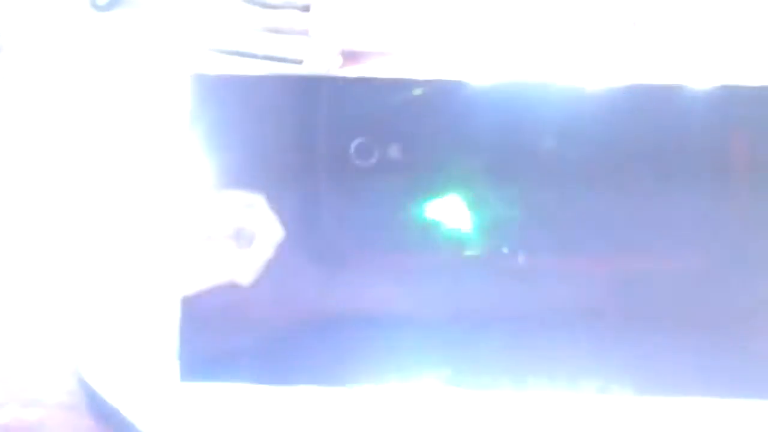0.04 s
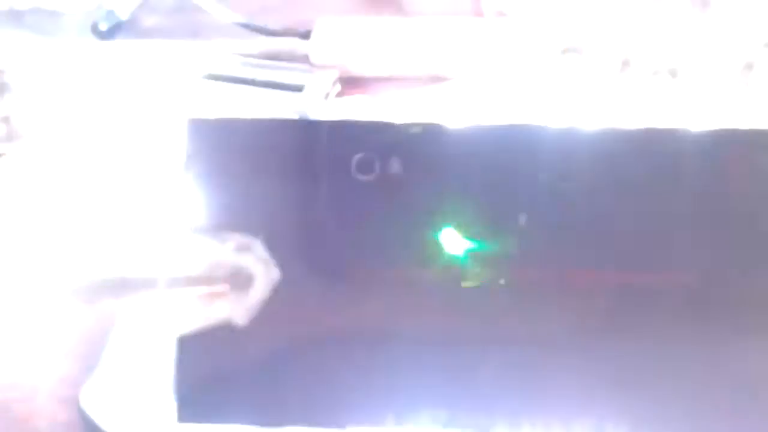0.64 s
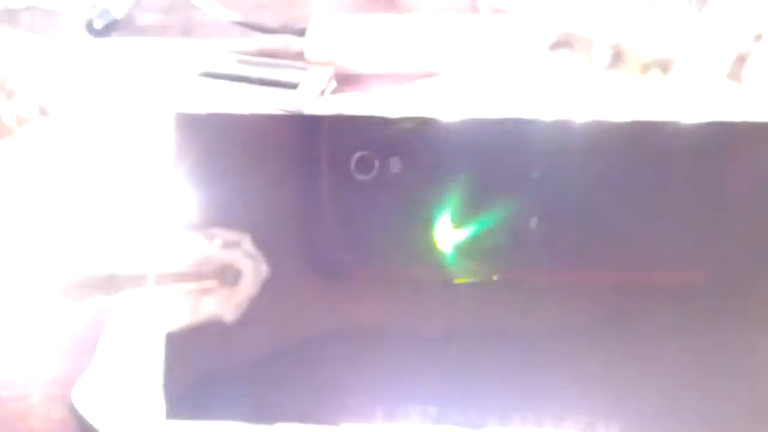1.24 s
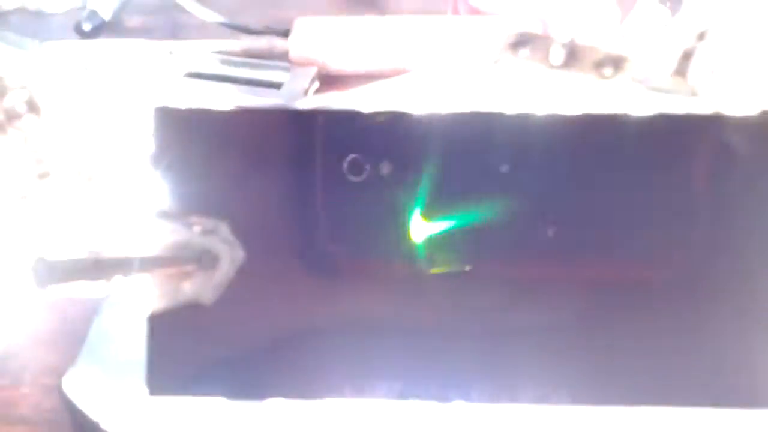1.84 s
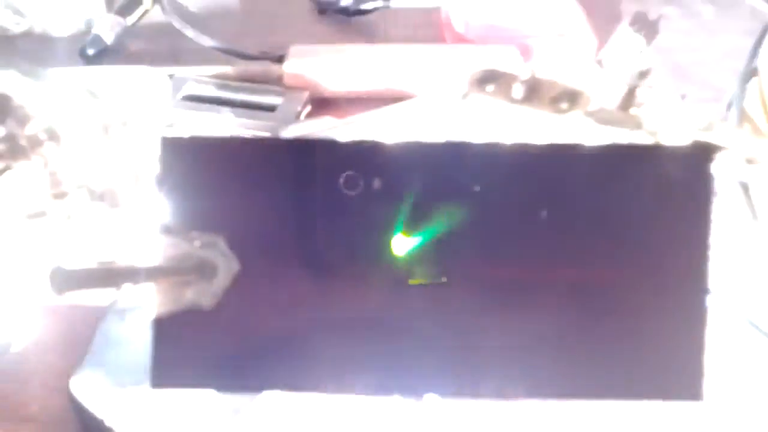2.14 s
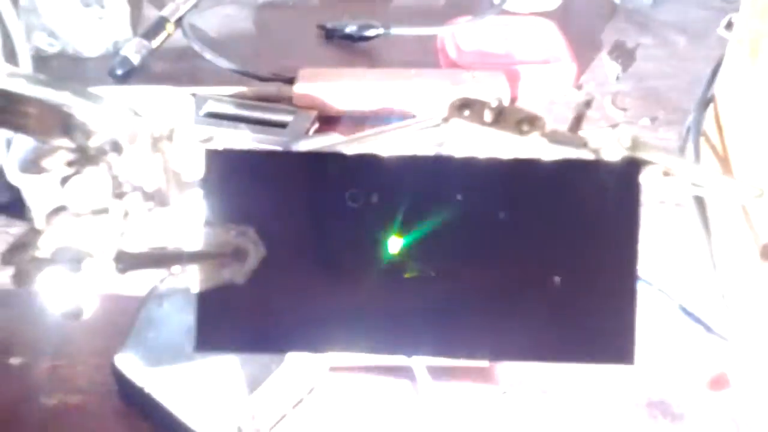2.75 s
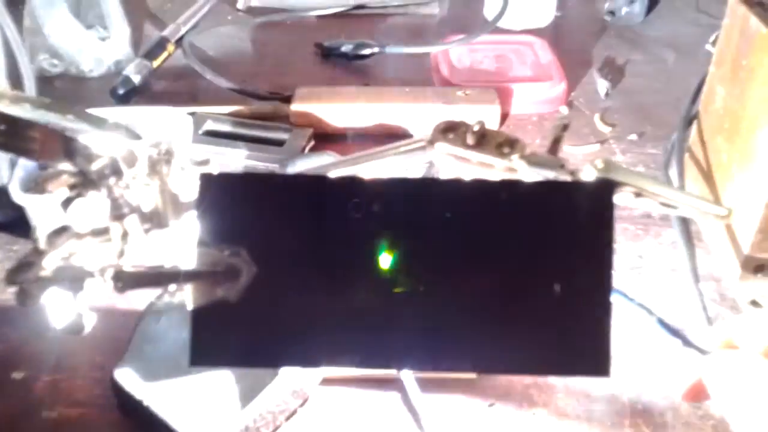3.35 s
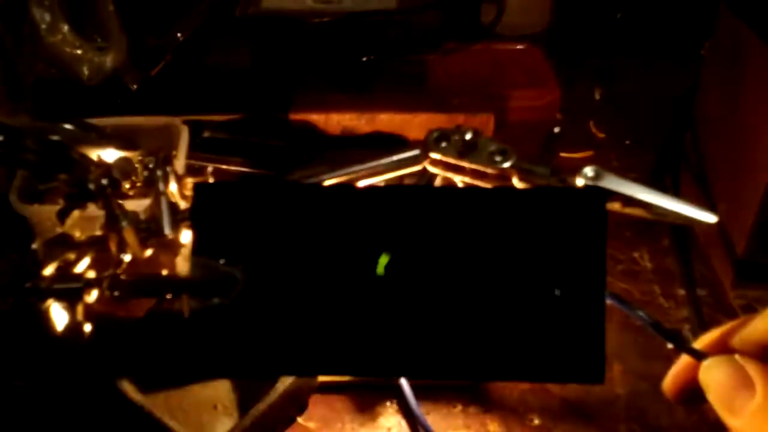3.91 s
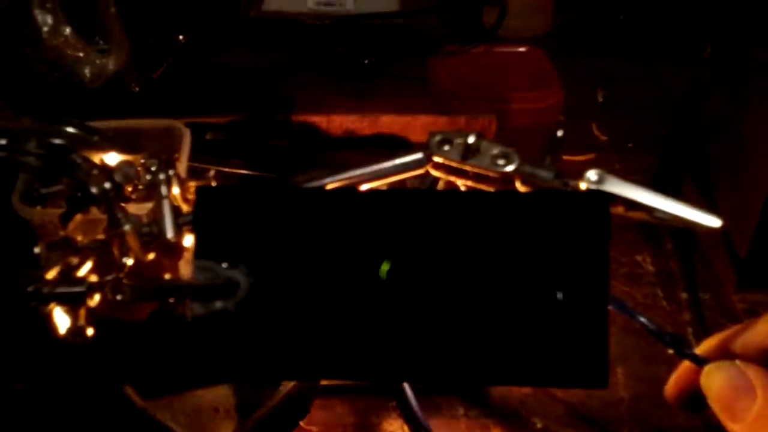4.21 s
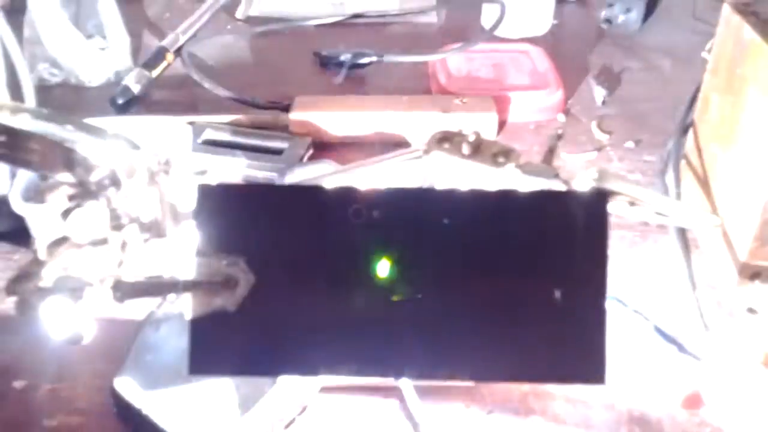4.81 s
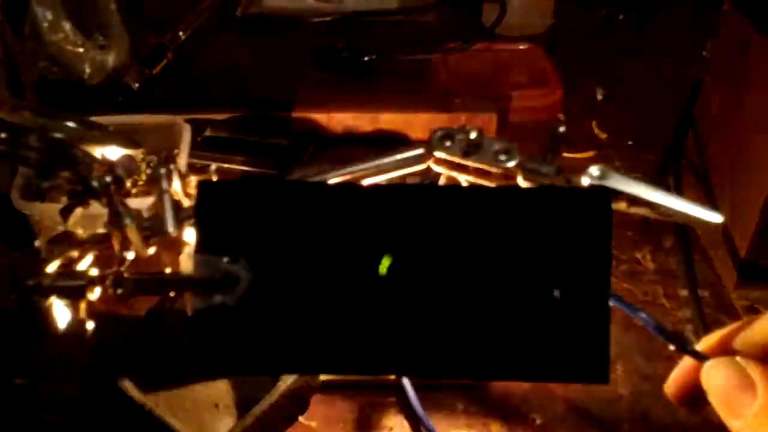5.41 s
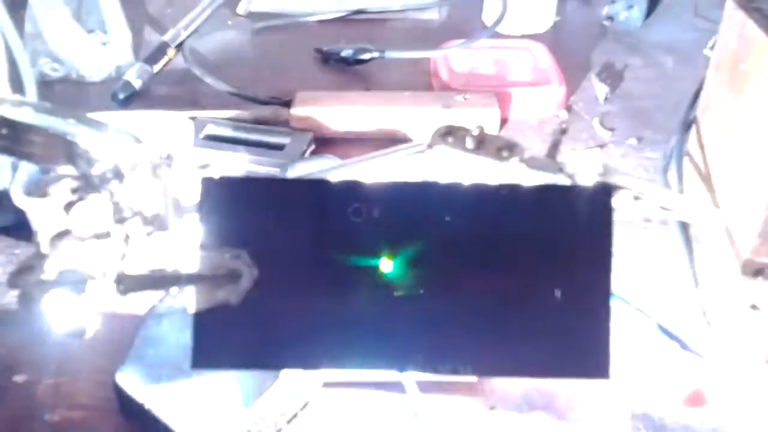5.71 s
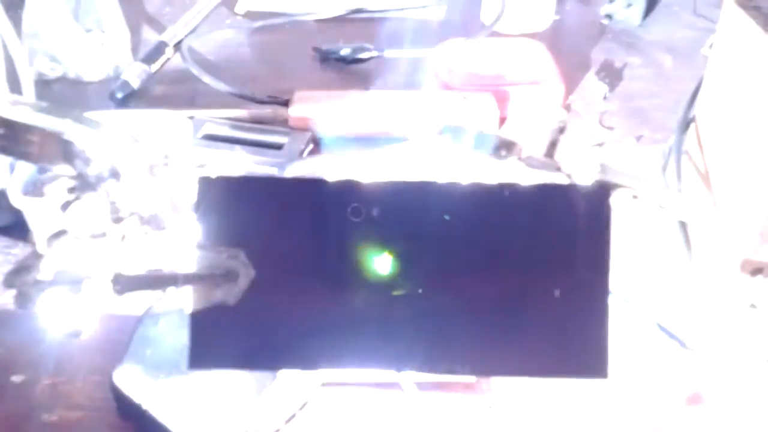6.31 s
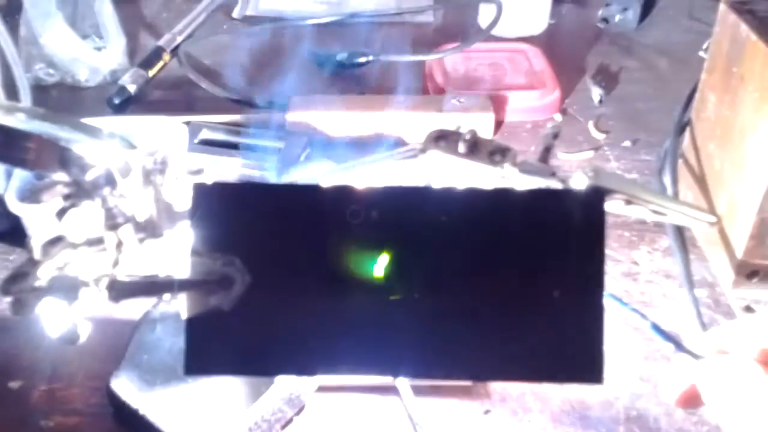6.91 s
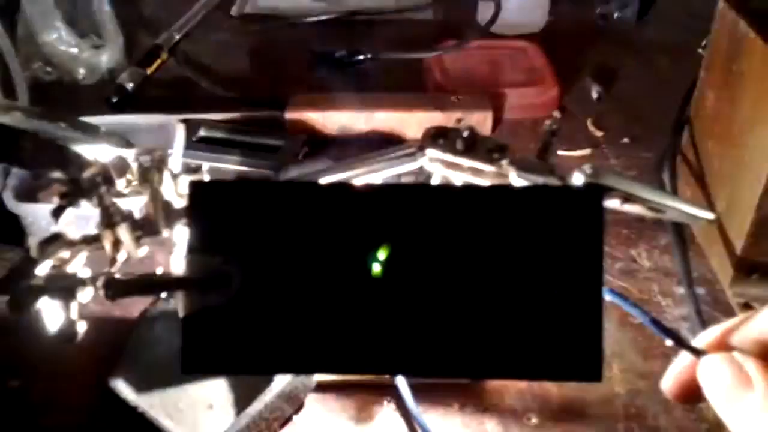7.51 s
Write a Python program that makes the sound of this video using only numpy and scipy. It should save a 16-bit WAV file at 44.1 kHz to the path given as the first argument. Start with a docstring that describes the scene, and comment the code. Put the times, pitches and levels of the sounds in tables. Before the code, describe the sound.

Close up in a small room, an electric arc between carbon rods spits out a short burst, then buzzes and hisses unevenly for about three seconds. A faint transformer hum shows in the pauses. The arc strikes twice more with sharp cracks and a gritty, high sizzle; the final burn stumbles with a few hollow pops and drops to a steadier, deeper buzz.

```python
"""On a workbench in a small room, a mains-fed carbon arc is struck four times near a small microphone.
Alternating current passes through zero twice a cycle, so in each half-cycle the arc lights, hisses on
the anode and goes out with a puff of collapsing gas. Often one polarity burns silently: the period
doubles and the buzz drops an octave. The gap cracks as it breaks down, narrow resonances give the hiss
a thin, ringing colour, and a transformer hums throughout, heard between the burns."""
import sys
import numpy as np
from scipy import signal
from scipy.fft import rfft, irfft
from scipy.io import wavfile

SR = 44100
rng = np.random.default_rng(int(sys.argv[2]) if len(sys.argv) > 2 else 0)


def inscribe(sig):
    """Save sig as 16-bit PCM at rate SR to the path in sys.argv[1].

    A 1-D sig is mono; a 2-D sig holds one channel per row.
    Samples are clipped to [-1, 1] before scaling.
    """
    pcm = np.round(np.clip(np.atleast_2d(sig).T, -1, 1) * 32767)
    wavfile.write(sys.argv[1], SR, pcm.astype(np.int16))


N = 332955
TIME = np.arange(N) / SR
MAINS_HZ = 60.03


def undb(db):
    """Amplitude grows tenfold for every 20 dB."""
    return 10 ** (np.asarray(db) / 20)


def level(x, db):
    """Normalisation: scale a signal to an rms level in dB."""
    return x * undb(db) / np.sqrt(np.mean(x ** 2))


def curve(table, t):
    """Linear interpolation: each column after the first (time), read at times t."""
    times, *columns = np.transpose(table)
    return [np.interp(t, times, column) for column in columns]


def colour(x, points, size=4096):
    """Minimum-phase filtering, with unit energy, through (Hz, dB) points."""
    hz, db = np.transpose(points)
    bins = np.maximum(np.arange(size // 2 + 1) * SR / size, 1)
    cepstrum = irfft(np.log(undb(np.interp(np.log(bins), np.log(hz), db))))
    cepstrum[1:size // 2] *= 2
    cepstrum[size // 2 + 1:] = 0
    response = irfft(np.exp(rfft(cepstrum)))
    return signal.fftconvolve(x, response / np.linalg.norm(response))[:N]


def wander(rate_hz):
    """Random modulation: Gaussian values joined by straight lines, with a spread near 1."""
    return np.interp(TIME * rate_hz, np.arange(N), rng.standard_normal(N))


def impulses(times, sizes):
    """Fractional delay: each click is shared between two samples."""
    out, at = np.zeros(N + 1), np.clip(times * SR, 0, N - 1)
    np.add.at(out, at.astype(int), sizes * (1 - at % 1))
    np.add.at(out, at.astype(int) + 1, sizes * (at % 1))
    return out[:N]


def fading(x, decay_s):
    """Exponential decay: every input dies away with one time constant."""
    return signal.lfilter([1], [1, -np.exp(-1 / (decay_s * SR))], x)


# One list per burn, from strike to break; the last settles into a calm, one-sided buzz.
# Each row: time in seconds, forward hiss, reverse hiss and puff in dB, rasp relative to hiss in dB,
# unrest from 0 to 1, ignition in milliseconds into the half-cycle.
ARC_BURNS = [
    [(0, -4, -8.5, -13, -10.5, 0.94, 0.76), (.12, -7, -7.5, -12, -6.5, 1, 1.6),
     (.203, -12, -12.5, -27, -13.5, 1, 1.3)],
    [(.507, -4.5, -6, -30.5, -15, .9, 2), (.63, -4, -4.5, -16, -13, .9, 2),
     (.95, -7.5, -5.5, -12, -10.5, 0.97, 2.73), (1.85, -10, -7.5, -14, -11, 0.99, 2.6),
     (2.3, -13.5, -12, -12, -5.5, 0.96, 2.6), (2.85, -13, -13.5, -17.5, -8.5, .8, 2.6),
     (3.1, -11.5, -16, -19.5, -11, 0.3, 2.68), (3.4, -14, -15, -20.5, -10.5, .3, 2.6),
     (3.53, -26.5, -22, -22.5, -2, .3, 4.1)],
    [(4.297, -18, -13, -38, -21, 0.8, 1.9), (4.36, -11, -4.5, -17.5, -15, 0.8, 2),
     (4.51, -11.5, -8.5, -11, -6.5, 1, 2), (4.58, -12, -9, -18, -8, .6, 2),
     (4.85, -7, -16, -22, -10, .3, 2.63), (4.97, -15, -7.5, -21, -12, 0.4, 2.9),
     (5.08, -17.5, -15, -21.5, -5.5, 0.1, 3.2)],
    [(5.53, -17, -7.5, -24, -11, 0.5, 1.4), (5.61, -3.5, -4, -11, -11.5, 0.9, 2),
     (5.89, -11.5, -10, -12, -3.5, 0.7, 1.8), (5.97, -41, -20.5, -16, -10, 0.8, 1.7),
     (6.06, -70, -14.5, -19, -13.5, 0.5, 1.5), (6.3, -73, -20, -18.5, -13, 0.3, 1.8),
     (6.92, -70, -17.5, -17, -18.5, 0.02, 2.9), (7.02, -70, -13, -16.5, -23, .03, 2.7),
     (7.09, -70, -21.5, -16, -16.5, 0.17, 3), (7.46, -70, -25.5, -18, -11, 0.3, 3.1),
     (7.476, -70, -70, -20, -8, 0, 3.1), (7.56, -70, -70, -26, -8, 0.1, 3.1)],
]
def burn(t, break_db_per_s=1201):
    """The arc's envelope: a gain that decays fast once it breaks, then the six settings at times t."""
    forward_db, reverse_db, puff_db, rasp_db, unrest, ignition_ms = curve(np.concatenate(ARC_BURNS), t)
    alive = sum((t >= rows[0][0]) * undb(-break_db_per_s * np.maximum(t - rows[-1][0], 0))
                for rows in ARC_BURNS)
    return alive, forward_db, reverse_db, puff_db, rasp_db, np.clip(unrest, 0, 1), ignition_ms


# Lulls of the sputtering arc. Each row: start and end in seconds, change of reverse hiss and of
# forward hiss in dB, preceding flare in dB.
ARC_LULLS = [(0.124, 0.155, -1, -27, -2.5), (0.566, 0.599, -35, -27, -0.5), (0.744, 0.779, -4, -4.5, 5),
             (1.03, 1.053, -20, -1, 2.5), (1.077, 1.101, -2, 2, -3.5), (1.142, 1.199, -33, -1, 0.5),
             (1.28, 1.328, -30, -0.5, 2.5), (1.38, 1.44, -30, 2, -0.5), (1.489, 1.515, -26, -0.5, -5),
             (1.543, 1.62, -32, 0.5, 6.5), (1.647, 1.714, -31, 3, 3), (1.748, 1.792, -19, 0, 3),
             (1.862, 1.865, -8, 3.5, 6.5), (1.928, 1.947, -20, 1, 4), (1.99, 2.05, -27, 0.5, 5),
             (2.124, 2.15, -19, 1, 0.5), (2.3, 2.317, -28, 0, 1.5), (2.382, 2.435, -25, 2.5, 5.5),
             (2.495, 2.517, -23, 3, 4.5), (2.584, 2.647, -20, -0.5, 10), (2.671, 2.713, -19, 0, 9),
             (2.76, 2.79, -12, -1, 7), (2.857, 2.879, -16, 5.5, 10.5), (2.957, 2.989, -4.5, 1, -2),
             (3.011, 3.055, -9, -1.5, 2), (3.135, 3.165, -20, -5, -3), (3.236, 3.255, -25, -8, -9),
             (3.281, 3.347, -30, -3.5, -1), (3.36, 3.528, -19, -1, -2), (4.316, 4.322, 0, -10.5, -3),
             (4.543, 4.575, -20, -2.5, -1), (4.685, 4.717, -17, -5, -5.5), (4.8, 4.818, -23, -14, -13),
             (4.878, 4.93, -26, -6.5, 0), (4.979, 5.12, -28, 0.5, 0), (6.27, 6.28, -7, 0, 3),
             (7.033, 7.052, -8, 0, 0)]
def sputter(t, flare_lead_s=0.015, flare_width_s=0.022, sag_lag_s=0.012, sag_db=-11.5):
    """Instability: the flame flares, tears off and leaves a lull, shifting hiss and flame size in dB."""
    start, end, reverse_db, forward_db, flare_db = np.transpose(ARC_LULLS)[:, :, None]
    lull = (t > start) & (t < end)
    shrunk = (t - sag_lag_s > start) & (t - sag_lag_s < end)
    flare = np.exp(-((t - start + flare_lead_s) / flare_width_s) ** 2)
    flame_db = flare_db * flare + sag_db * shrunk
    return (forward_db * lull).sum(axis=0), (reverse_db * lull).sum(axis=0), flame_db.sum(axis=0)


def extinction_ms(unrest):
    """Extinction comes later in the half-cycle when the arc is restless."""
    return 4.87 + 0.63 * unrest


def flame_size(t):
    """Amplitude modulation: the gas column follows the sputtering as far as the arc is restless."""
    alive, _, _, puff_db, _, unrest, _ = burn(t)
    *_, flame_db = sputter(t)
    return alive * undb(puff_db + unrest * flame_db)


def spark_noise(envelope, spectrum, bench_db=-4, decay_s=0.0023):
    """Scattering from clutter on the bench draws out the energy of each noise burst."""
    scattered = fading(envelope ** 2, decay_s) / (decay_s * SR)
    share = undb(bench_db) ** 2
    power = (envelope ** 2 + share * scattered) / (1 + share)
    return colour(np.sqrt(power) * rng.standard_normal(N), spectrum)


# Spectra of the arc's broad hiss, lower rasp and thin, high spitting.
# Each row: frequency in Hz, relative level in dB.
HISS_SPECTRUM = [(2500, -43), (3300, -14.5), (4800, -14), (6200, -7), (7600, -7.5), (8800, -8.5),
                 (10000, -6), (10800, -1), (11300, -4.5), (11900, 0), (12900, 0.5), (13600, -4.5),
                 (14300, -2), (15800, -10.5)]
RASP_SPECTRUM = [(40, -13.5), (110, -14.5), (300, -6), (480, -7.5), (750, 1.5), (1120, -6.5), (1400, 1.5),
                 (1700, 0.5), (2020, -6.5), (2300, -2.5), (2750, -3), (3200, -15), (4200, -10),
                 (7000, -11.5), (12000, -34.5)]
SPIT_SPECTRUM = [(5000, -37), (8500, -11), (10800, -6.5), (12000, -7.5), (13000, 0), (13800, -3),
                 (15800, -6.5)]
def anode_sizzle(zeros, reverse, jitter_ms=0.53, rise_ms=0.23, fall_ms=0.54, scatter_db=1.15):
    """Gated noise: the anode spot hisses and rasps from ignition until the current dies."""
    gain_draw, start_draw, end_draw, rasp_draw = rng.standard_normal((len(zeros), 4)).T
    middle = zeros + 1 / (4 * MAINS_HZ)
    alive, forward_db, reverse_db, _, rasp_db, unrest, ignition_ms = burn(middle)
    forward_lull_db, reverse_lull_db, flame_db = sputter(middle)
    hiss_db = np.where(reverse, reverse_db + reverse_lull_db, forward_db + forward_lull_db)
    gain = alive * undb(hiss_db + scatter_db * gain_draw)
    start_ms = ignition_ms + jitter_ms * (1 + unrest) / 2 * start_draw
    end_ms = extinction_ms(unrest) + 0.36 + unrest * (0.5 + 1.03 * end_draw)
    half = (TIME * 2 * MAINS_HZ).astype(int)  # the half-cycle each sample lies in
    ms = (TIME - zeros[half]) * 1000
    gate = (1 + np.tanh((ms - start_ms[half]) / rise_ms)) * (1 + np.tanh((end_ms[half] - ms) / fall_ms))
    burning = level(gate, 0) * gain[half]
    calm = 1 - unrest[half]
    # The spot jumps about, which makes the noise gritty; a calm arc does so in separate snaps.
    jumps = wander(2500)
    snaps = undb(1.5 * calm * wander(1800))
    hiss = burning * level(undb(3 * jumps), -1) * snaps
    # A bigger flame rasps more.
    rasp_gain = undb(rasp_db + unrest * (0.27 * flame_db + 3.5 * rasp_draw))
    rasp = burning * level(undb(6 * jumps), 0) * rasp_gain[half]
    # As the arc calms, hiss gives way to spitting.
    spit = spark_noise(hiss * calm * undb(2), SPIT_SPECTRUM, bench_db=-8)
    return spit + spark_noise(hiss * undb(-7 * calm), HISS_SPECTRUM) + spark_noise(rasp, RASP_SPECTRUM)


# Spectra of the puff at extinction and the kick at ignition. Each row: frequency in Hz, level in dB.
PUFF_SPECTRUM = [(25, -21), (60, -5.5), (120, 1), (240, 0.5), (360, -3.5), (480, -11.5), (600, -11),
                 (720, -10.5), (850, -18.5), (1100, -23), (1600, -24), (2500, -40.5), (6000, -65)]
KICK_SPECTRUM = [(200, -22.5), (450, -14), (720, 1), (900, -4.5), (1150, -14.5), (1650, -1.5),
                 (2100, -21.5), (2650, -17.5), (3500, -23), (8000, -48)]
# The kick hardens as the gap grows. Each row: time in seconds, level relative to the puff in dB.
KICK_LEVELS = [(0, -24.5), (5.9, -19), (7, -14), (7.5, -10.5)]
def gas_puffs(zeros, reverse, puff_db=16.5, scatter_db=2.5, jitter_ms=0.21, reverse_lead_ms=0.22):
    """Thermal expansion: gas kicks outward at each reverse ignition and collapses at every extinction."""
    time_draw, size_draw = rng.standard_normal((len(zeros), 2)).T
    *_, unrest, ignition_ms = burn(zeros)
    collapse_ms = extinction_ms(unrest) - reverse_lead_ms * reverse + jitter_ms * unrest * time_draw
    times = zeros + collapse_ms / 1000
    size = flame_size(times) * undb(puff_db + unrest * (scatter_db * size_draw - 1.13))
    kicks = impulses(zeros + ignition_ms / 1000, size * reverse * undb(curve(KICK_LEVELS, zeros)[0]))
    return colour(impulses(times, -size), PUFF_SPECTRUM) + colour(kicks, KICK_SPECTRUM)


def flame_flutter(zeros, flutter_db=-30):
    """Convection: hot gas rising from the arc flutters faintly."""
    spectrum = [(15, -10.5), (35, -7.5), (70, 5), (120, -8), (400, -25.5), (2000, -49.5)]
    flutter = colour(rng.standard_normal(N), spectrum)
    return flutter * np.interp(TIME, zeros, flame_size(zeros)) * undb(flutter_db + 2 * wander(12))


def resonance(x, hz, width_hz):
    """A damped resonator passes a band, with unit gain at its centre."""
    return signal.lfilter(*signal.iirpeak(hz, hz / width_hz, fs=SR), x)


# Narrow peaks in the arc's hiss. Each row: frequency in Hz, bandwidth in Hz, gain in dB.
HISS_PEAKS = [(2590, 300, -16), (3970, 300, -9), (9270, 260, -4), (10810, 250, -5.5), (11700, 67, -7.5),
              (12880, 250, -8.5), (13250, 180, -3.5), (14560, 220, -9.5)]
def hiss_resonances(buzz):
    """Narrow fixed resonances give the arc's hiss a thin, ringing colour."""
    return sum(undb(db) * resonance(buzz, hz, width_hz) for hz, width_hz, db in HISS_PEAKS)


def room_echoes(x, echo_db=-10.5, t60_s=0.38, treble_t60_s=0.27, delay_s=0.003, split_hz=6000):
    """Reverberation: dense reflections decay exponentially, the treble soonest."""
    t = TIME[:SR // 2]
    echoes = rng.standard_normal(len(t)) * (t > delay_s)
    low = signal.sosfiltfilt(signal.butter(2, split_hz, fs=SR, output="sos"), echoes)
    tail = low * undb(-60 * t / t60_s) + (echoes - low) * undb(-60 * t / treble_t60_s)
    return undb(echo_db) * signal.fftconvolve(x, tail / np.linalg.norm(tail))[:N]


# Spectrum of the room's background. Each row: frequency in Hz, relative level in dB.
AMBIENT_SPECTRUM = [(15, -37), (25, -6), (123, -4), (249, -18), (301, -22.5), (363, -0.5), (416, -30),
                    (476, -18.5), (659, -25), (1070, -22.5), (1560, -29.5), (16000, -28.5)]
def room_noise(noise_db=-60.5):
    """The noise floor: a faint, low rush whose level wavers."""
    return level(colour(rng.standard_normal(N), AMBIENT_SPECTRUM), noise_db) * undb(0.89 * wander(7.8))


# Harmonics of the core. Each row: multiple of twice the mains frequency, relative level in dB.
CORE_HARMONICS = [(1, 0.5), (2, -9.5), (3, -4), (4, -8), (5, -16), (6, -18.5), (7, -18), (8, -25), (9, -10),
                  (10, -15), (11, -23.5), (12, -21), (13, -32), (14, -19), (15, -28), (16, -30), (17, -20),
                  (18, -32.5)]
def transformer(hum_db=-56):
    """Magnetostriction: the core tightens twice in each mains cycle and its plates buzz."""
    phase = 2 * np.pi * 2 * MAINS_HZ * TIME
    hum = sum(undb(db) * np.cos(k * phase + 1.1 * rng.standard_normal()) for k, db in CORE_HARMONICS)
    return level(hum, hum_db) * undb(0.4 * wander(4.6))


# Breakdowns of the gap. Each row: time in seconds, relative levels of hiss and of rasp in dB.
BREAKDOWNS = [(0.5045, 0, -21), (0.5108, 3, -32), (0.602, 15, -5), (2.401, 2.5, -22), (3.052, 8, -25),
              (3.171, 4, -25), (3.3843, 6.5, -23), (4.3006, 0, -21), (4.3237, 6, -33), (4.8167, 7, -21),
              (4.942, 0.5, -22), (5.5351, -7.5, -13.5), (5.9572, -3, -9), (6.2897, 2, -17),
              (6.3576, 8, -27), (6.4412, 5, -30), (6.4572, 5, -15.5), (6.4732, -1, -17), (6.5408, 3, -15.5),
              (6.641, 3.5, -40), (6.773, 6, -24), (6.858, 2, -42), (6.9236, -2, -33), (6.9587, 3, -41),
              (6.9915, -11, -35), (7.0736, 2, -40)]
def cracks(hiss_gain_db=-7, rasp_gain_db=8, decay_s=0.00033):
    """Electrical breakdown: the gap gives way in a bright, sharp burst of noise."""
    times, hiss_db, rasp_db = np.transpose(BREAKDOWNS)
    hiss = fading(impulses(times, undb(hiss_db + hiss_gain_db)), decay_s)
    rasp = fading(impulses(times, undb(rasp_db + rasp_gain_db)), decay_s)
    return spark_noise(hiss, HISS_SPECTRUM) + spark_noise(rasp, RASP_SPECTRUM)


def rod_handling(rub_s=3.83, rub_db=-63, bump_s=3.875, bump_db=-53, bump_hz=81):
    """Friction and impact: a faint rub and a soft bump as the rods are moved together."""
    friction = colour(rng.standard_normal(N), [(1000, -16), (3000, 1.5), (8000, -2.5), (16000, -9)])
    rub = friction * np.exp(-((TIME - rub_s) / 0.022) ** 2)
    age = np.maximum(TIME - bump_s, 0)
    bump = np.sin(2 * np.pi * bump_hz * age) * np.exp(-age / 0.12)
    return undb(rub_db) * rub + undb(bump_db) * bump


# Stumbles of the long arc. Each row: time in seconds, relative level in dB.
STUMBLES = [(5.904, -3.5), (5.924, -12), (5.958, 0.5), (6.258, -6), (6.372, -13)]
def hollow_pops(gain_db=30):
    """Impulse response: each stumble of the arc rings the air over the bench."""
    times, db = np.transpose(STUMBLES)
    return resonance(impulses(times, undb(db + gain_db)), hz=680, width_hz=93)


def scene():
    """Superposition: the arc, its echoes and the quiet background add in one channel."""
    half_cycles = np.arange(int(N / SR * 2 * MAINS_HZ) + 1)
    zeros = half_cycles / (2 * MAINS_HZ)  # zero crossings of the current, in seconds
    reverse = half_cycles % 2 == 1
    buzz = anode_sizzle(zeros, reverse) + cracks() + hollow_pops()
    arc = buzz + hiss_resonances(buzz) + gas_puffs(zeros, reverse)
    room = room_echoes(arc) + room_noise()
    return (arc + room + flame_flutter(zeros) + transformer() + rod_handling())[None]


def record(dry, ceiling=0.7, cutoff_hz=15950):
    """Saturation: the microphone overloads on the loudest peaks; a low-pass filter cuts the top."""
    limited = dry / (1 + (dry / ceiling) ** 4) ** 0.25
    low_pass = signal.firwin(401, cutoff_hz, fs=SR, window=("kaiser", 9))
    return signal.fftconvolve(limited, low_pass[None], "same")


dry = scene()
out = record(dry)
inscribe(out)
```